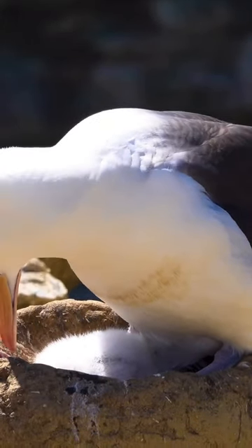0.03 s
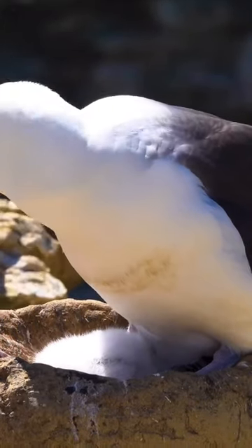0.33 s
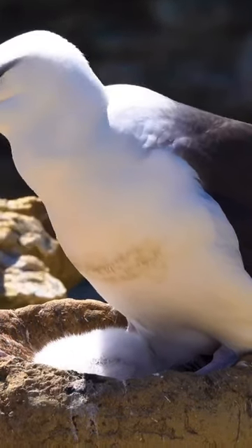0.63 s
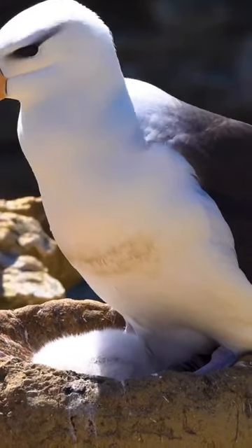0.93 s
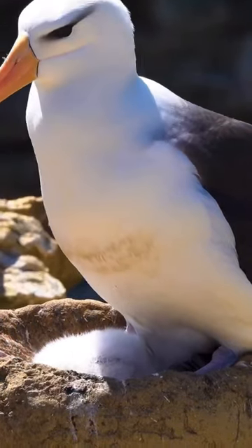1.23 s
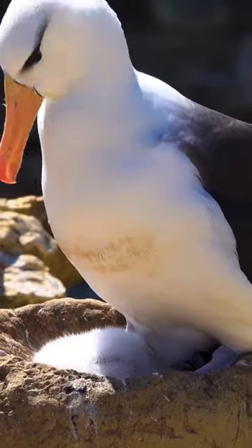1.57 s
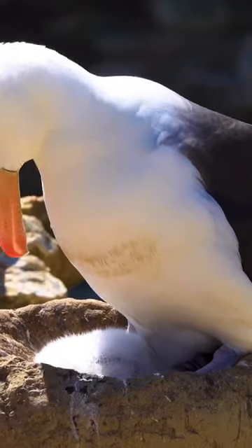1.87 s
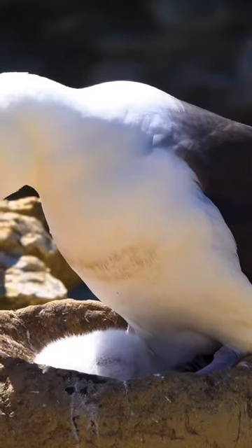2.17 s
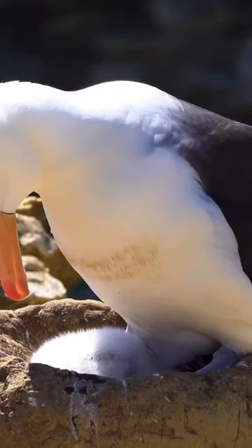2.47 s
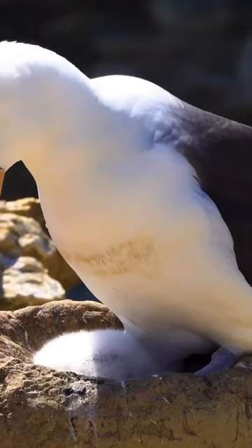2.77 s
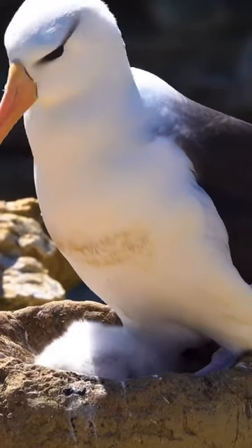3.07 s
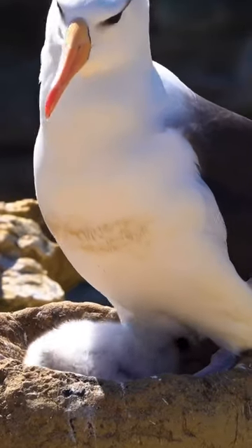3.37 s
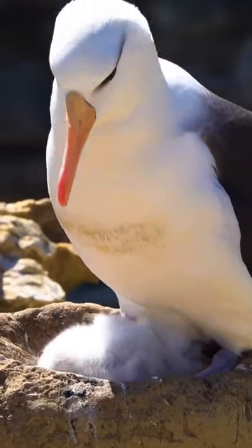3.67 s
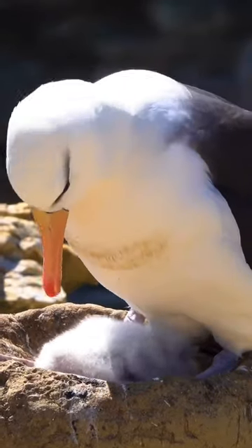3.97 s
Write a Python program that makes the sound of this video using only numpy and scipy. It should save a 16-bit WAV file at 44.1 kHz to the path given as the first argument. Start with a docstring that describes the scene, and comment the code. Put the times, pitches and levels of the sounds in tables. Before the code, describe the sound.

Harsh, raspy seabird squawks repeat close by, about every 0.4 seconds, some breaking into falling squeals. Thin arched whistles come around 0.5, 1.7 and 2.8 seconds. From about 3.1 seconds the calls become a louder cackle with short yips and faint grunts. Dry snaps sound near the start and at 3.9 seconds. A distant colony's wash and a soft hiss of wind or surf continue throughout.

```python
"""Seabird colony, close by.

Harsh squawks come about every 0.4 s: irregular flaps of the syrinx ring the throat's resonances.
Some break into a falling squeal. Thin arched whistles, short yips, dry snaps and faint grunts join in,
all with short reflections from a cliff. Behind: the far colony's restless wash, a hiss of wind or surf."""
import sys
import numpy as np
from scipy import signal
from scipy.fft import rfft, irfft
from scipy.io import wavfile
from scipy.ndimage import uniform_filter1d, map_coordinates

SR = 44100
rng = np.random.default_rng(int(sys.argv[2]) if len(sys.argv) > 2 else 0)


def int16_out(signal):
    """Quantize to a 16-bit WAV file."""
    q = np.round(np.clip(np.atleast_2d(signal).T, -1, 1) * 32767)
    wavfile.write(sys.argv[1], SR, q.astype(np.int16))


N = 176400

# Far colony EQ: freq_hz, gain_db
WASH_EQ = [(700, -49), (950, -42.5), (1050, -18), (1300, -28), (1600, 1.5), (2100, 5), (2700, -0.5),
           (3500, -5.5), (5000, -14.5), (7000, -26), (15000, -60)]
# Hiss EQ: freq_hz, gain_db
HISS_EQ = [(800, -29), (5000, 1.5), (11000, 3.5), (15500, 2.5)]
# Hiss envelope: time_s, level_db
HISS_ENVELOPE = [(0, -44.5), (.8, -54.5), (1.25, -51.5), (1.62, -42), (2.05, -46.5), (2.35, -53),
                 (2.749, -42), (3.25, -41), (3.72, -53)]
# Dry snaps: start_s, centre_hz, gain_db
SNAPS = [(.059, 2200, -25), (.501, 2450, -20), (3.872, 2120, -20), (3.893, 3100, -15.5), (3.922, 2380, -17)]
# Rasps of the squawks, one gain per throat band: start_s, length_s, low_db, mid_db, upper_db, hiss_db
RASPS = [(0.129, 0.1, -40.5, -23, -34.5, -37.5), (0.242, 0.052, -53, -37, -51, -63),
         (0.488, 0.045, -82, -23.5, -33.5, -37), (0.533, 0.094, -48.5, -26, -34, -31),
         (0.822, 0.052, -50, -25.5, -36.5, -46), (0.916, 0.037, -51, -35, -36, -38),
         (0.959, 0.084, -38, -30.5, -28.5, -34.5), (1.104, 0.027, -44.5, -29.5, -44, -44.5),
         (1.194, 0.037, -89, -34, -41.5, -45), (1.303, 0.024, -42, -37, -35, -41),
         (1.351, 0.084, -36, -33.5, -30.5, -37), (1.437, 0.049, -43.5, -30.5, -39.5, -40.5),
         (1.67, 0.094, -53, -30.5, -51, -41.5), (1.72, 0.12, -35.5, -25.5, -35.5, -31),
         (1.957, 0.048, -49, -26, -36.5, -46), (2.051, 0.033, -44.5, -33, -35, -36),
         (2.091, 0.084, -38, -30, -28.5, -34.5), (2.235, 0.051, -52.5, -32, -46, -46.5),
         (2.331, 0.026, -84, -30.5, -38, -44), (2.437, 0.036, -42, -34.5, -33.5, -43.5),
         (2.485, 0.082, -36, -31.5, -30, -37.5), (2.574, 0.044, -42, -29.5, -39.5, -44.5),
         (2.802, 0.056, -52, -29.5, -42, -38.5), (2.858, 0.12, -37.5, -24, -34, -31.5),
         (3, 0.091, -46, -31, -31, -49), (3.177, 0.046, -34.5, -24.5, -33.5, -53),
         (3.264, 0.079, -35, -24.5, -25.5, -34), (3.333, 0.081, -33, -20.5, -29.5, -35),
         (3.529, 0.063, -43.5, -20, -25, -31), (3.6, 0.046, -41.5, -22.5, -35, -44),
         (3.656, 0.063, -28.5, -25.5, -32, -44.5), (3.871, 0.079, -40.5, -24, -25.5, -37),
         (3.932, 0.077, -40, -22, -28, -40)]
# Throat resonances, one list per band (low, mid, upper, hiss): centre_hz, width_hz, gain_db
THROAT_BANDS = [
    [(1056, 174, -6), (1231, 290, -2)],
    [(1596, 184, 2), (2160, 667, -2.5), (2350, 130, 1.5), (2605, 260, -1)],
    [(2950, 200, -9), (3280, 960, -2.5), (4180, 660, -5.5), (4670, 320, -4), (5424, 710, -8)],
    [(6020, 1570, 2), (7610, 670, 2), (8340, 490, 0), (10100, 7400, -10)],
]
# Squeals and yips: start_s, length_s, first_hz, last_hz, level_db
SQUEALS = [(.153, 0.047, 1620, 1524, -21), (.208, 0.032, 1665, 1484, -24), (.514, 0.026, 1520, 1530, -27.5),
           (.568, 0.038, 1534, 1557, -26), (1.362, .018, 1093, 1120, -30.5),
           (1.378, 0.036, 1630, 1603, -24), (1.468, 0.031, 2630, 2675, -29),
           (1.512, .012, 2430, 2030, -25.5), (1.739, 0.017, 1280, 1220, -27.5),
           (1.74, 0.019, 1614, 1620, -21.5), (1.758, 0.051, 1802, 1531, -22),
           (1.762, 0.038, 3570, 3250, -31.5), (1.783, .02, 1249, 1098, -26.5),
           (1.817, 0.026, 3140, 3010, -26.5), (1.828, 0.022, 2194, 2094, -24.5),
           (3.303, 0.026, 2275, 2354, -18), (3.402, .0087, 1775, 1850, -16.5),
           (3.406, 0.0063, 2560, 2430, -16.5), (3.489, 0.0053, 2070, 1790, -15.5),
           (3.519, 0.0039, 2310, 2240, -15.5), (3.535, 0.014, 2723, 2674, -18.5),
           (3.581, 0.0093, 2620, 2540, -16.5), (3.665, 0.018, 1516, 1430, -24.5),
           (3.912, .011, 1960, 1950, -21.5), (3.987, .016, 2248, 2407, -19)]
# Arched whistles: start_s, length_s, top_hz, droop_hz, level_db
WHISTLES = [(.298, .16, 4080, 850, -38.5), (.53, .05, 4100, 120, -36), (.622, .062, 4120, 200, -42),
            (.672, .09, 4090, 480, -42), (1.62, .18, 4040, 520, -35), (1.876, .072, 4600, 760, -40)]
# Grunts: start_s, length_s, pitch_hz, level_db
GRUNTS = [(1.949, .043, 567, -62), (3.085, .043, 570, -59), (3.318, .045, 687, -49),
          (3.315, .065, 330, -61), (3.664, .04, 323, -54), (3.685, .035, 850, -40), (3.71, .07, 730, -50),
          (3.854, .065, 713, -51)]
# Phase lead of the left microphone: freq_hz, lead_rad
LEFT_LEAD = [(100, 0.39), (700, 0.29), (2700, 0.44), (5000, 0.82), (6800, .05), (15000, 0.024)]


def undb(db):
    return 10 ** (np.asarray(db) / 20)


def unit_rms(x):
    return x / np.sqrt(np.mean(x ** 2))


def hold_rms(x, window_s=.04):
    """Even out the loudness, keep the fast grain."""
    return x / np.sqrt(uniform_filter1d(x ** 2, int(window_s * SR)) + 1e-18)


def wander(rate_hz):
    """Smooth random curve, spread near 1."""
    hold = max(int(SR / rate_hz), 2)
    steps = np.repeat(rng.standard_normal(N // 40)[:N // hold + 1], hold)
    return 1.9 * uniform_filter1d(uniform_filter1d(steps, hold), hold)[:N]


def resonate(x, centre_hz, width_hz):
    """The same band-pass twice; width_hz is per pass."""
    b, a = signal.iirpeak(min(centre_hz, .45 * SR), centre_hz / width_hz, fs=SR)
    return signal.lfilter(b, a, signal.lfilter(b, a, x))


def per_bin(points):
    """Interpolate (freq_hz, value) onto FFT bins, in log frequency."""
    hz, value = np.array(points).T
    return np.interp(np.log(np.arange(N // 2 + 1) * SR / N + 1), np.log(hz), value)


def add(out, start_s, sound):
    i = max(int(start_s * SR), 0)
    out[i:i + len(sound)] += sound[:max(N - i, 0)]


def segment(x, start_s, length_s):
    return np.roll(x, -int(start_s * SR))[:int(length_s * SR)]


def tone(pitch_hz, taper, harmonics_db=(0,)):
    """Harmonics on a pitch curve, faded in and out."""
    phase = 2 * np.pi * np.cumsum(pitch_hz) / SR
    wave = sum(undb(db) * np.sin(k * phase) for k, db in enumerate(harmonics_db, 1))
    return np.sqrt(2) * signal.windows.tukey(len(pitch_hz), taper) * wave


def with_repeat(rows, from_s=1, to_s=2, delay_s=1.133):
    """All rows, plus a delayed copy of one phrase."""
    phrase = [(start_s + delay_s, *rest) for start_s, *rest in rows if from_s < start_s < to_s]
    return list(rows) + phrase


def pan(right_db):
    return undb(np.array([[-.5], [.5]]) * right_db)


def mic_pair(x):
    """Mono to two microphones; the left leads in phase."""
    turn = np.exp(.5j * per_bin(LEFT_LEAD))
    return irfft(rfft(x) * np.array([turn, 1 / turn]), N)


def colony_wash(level_db=-34, swell_db=1.1, flicker_db=2.8, common_share=.59):
    """Far colony, mostly right: noise bands flicker alone and swell together."""
    bands = 0
    for hz in np.geomspace(900, 14000, 14):
        bands += resonate(rng.standard_normal((3, N)), hz, hz / 3) * undb(flicker_db * wander(45))
    shaped = irfft(rfft(bands) * undb(per_bin(WASH_EQ)), N)
    common, per_ear = mic_pair(shaped[0]), shaped[1:]
    wash = unit_rms(np.sqrt(common_share) * common + np.sqrt(1 - common_share) * per_ear)
    return wash * undb(level_db + swell_db * wander(26.59)) * pan(right_db=6)


def hiss(width=.23):
    """Wind or surf: smooth high noise, swelling slowly."""
    mid, side = irfft(rfft(rng.standard_normal((2, N))) * undb(per_bin(HISS_EQ)), N)
    air = unit_rms(mid + width * side * np.array([[1], [-1]]))
    level_db = np.interp(np.arange(N) / SR, *np.array(HISS_ENVELOPE).T)
    return air * undb(level_db) * pan(right_db=2)


def snaps(decay_s=.0025, width_hz=890):
    """Dry cracks: noise bursts through one resonance."""
    out, t = np.zeros(N), np.arange(SR // 50) / SR
    for start_s, centre_hz, gain_db in SNAPS:
        burst = rng.standard_normal(len(t)) * np.exp(-t / decay_s)
        crack = resonate(burst, centre_hz, width_hz)
        add(out, start_s, 2 * undb(gain_db) * crack / np.abs(crack).max())
    return out


def syrinx_rattle(rate_hz=261.4, jitter=.35, scatter_db=.5, puff_s=.0022, click_db=-18.5, flutter_db=.9):
    """Irregular flaps, each a click and a puff of air."""
    gap, strength = rng.standard_normal((N // 60, 2)).T
    at = (np.cumsum(np.exp(jitter * gap)) * SR / rate_hz).astype(int)
    clicks = np.zeros(N)
    clicks[at[at < N]] = undb(scatter_db * strength[at < N])
    puffs = signal.lfilter([1], [1, -np.exp(-1 / (puff_s * SR))], clicks) * rng.standard_normal(N)
    return (unit_rms(puffs) + undb(click_db) * unit_rms(clicks)) * undb(flutter_db * wander(70.4))


def squawk_source(rush_db=-2.5, cackle_from_s=3.1, beat_hz=90, beat_jitter=.35, beat_fade_db=13):
    """The rattle, first evened out by a rush of air, then broken into a cackle of fading beats."""
    rattle = syrinx_rattle()
    beat_phase = np.cumsum(beat_hz * np.exp(beat_jitter * wander(70.4))) / SR % 1
    cackle = unit_rms(rattle * undb(-beat_fade_db * beat_phase))
    breathy = rattle + undb(rush_db) * rng.standard_normal(N)
    return np.where(np.arange(N) / SR < cackle_from_s, breathy, cackle)


def squawks(attack_s=.01, release_s=.024, sag=.05, flicker_db=2.6, mid_squeak_share=.35):
    """The syrinx rings the throat; the resonances sink through each rasp."""
    t, source = np.arange(N) / SR, squawk_source()
    band_power, bend = np.zeros((len(THROAT_BANDS), N)), np.zeros(N)
    for start_s, length_s, *gains_db in RASPS:
        ramps = np.minimum((t - start_s) / attack_s, (start_s + length_s - t) / release_s)
        gate = np.clip(ramps + .5, 0, 1)
        on = gate > 0
        band_power[:, on] += np.outer(undb(gains_db), gate[on]) ** 2
        bend[on] += sag * (t[on].mean() - t[on]) / length_s
    out = 0
    for power, band, squeak_share in zip(band_power, THROAT_BANDS, (0, mid_squeak_share, 0, 0)):
        ring = 0
        for k, (centre_hz, width_hz, gain_db) in enumerate(band):
            gain = (-1) ** k * undb(gain_db + flicker_db * wander(70.4))
            ring += gain * resonate(source, centre_hz, width_hz)
        if squeak_share:
            ring = np.sqrt(1 - squeak_share) * unit_rms(ring) + np.sqrt(squeak_share) * squeaks()
        sinking = map_coordinates(ring, [np.cumsum(1 + bend)], mode="mirror")
        out += np.sqrt(power) * hold_rms(sinking)
    return out


def squeaks(count=900, median_hz=2155.6, spread=.1688, median_s=.00893, scatter_db=4):
    """Tiny random gliding tones within the rasps."""
    out, starts_s = np.zeros(N), rng.random(count) * N / SR
    for start_s, (pitch, glide, length, strength) in zip(starts_s, rng.standard_normal((count, 4))):
        samples = int(SR * median_s * np.exp(length / 2)) + 2
        pitch_hz = median_hz * np.exp(spread * (pitch + glide * np.linspace(0, .5, samples)))
        add(out, start_s, undb(scatter_db * strength) * tone(pitch_hz, taper=.61))
    return unit_rms(out)


def squeals(wobble=.009, rough_db=1.4):
    """The voice catches on a short, unsteady glide."""
    out, detune = np.zeros(N), 1 + wobble * wander(400)
    for start_s, length_s, first_hz, last_hz, level_db in with_repeat(SQUEALS):
        pitch_hz = np.linspace(first_hz, last_hz, int(length_s * SR)) * segment(detune, start_s, length_s)
        add(out, start_s, undb(level_db) * tone(pitch_hz, taper=.7, harmonics_db=(0, -20, -27)))
    return out * undb(rough_db * wander(460))


def whistles(arch_power=2.3, wobble=.004, jitter=.009, rough_db=2.2):
    """Thin, slightly hoarse peeps that rise, hold and fall."""
    out, detune = np.zeros(N), 1 + wobble * wander(90) + jitter * wander(1100)
    for start_s, length_s, top_hz, droop_hz, level_db in with_repeat(WHISTLES):
        arch_hz = top_hz - droop_hz * np.abs(np.linspace(-1, 1, int(length_s * SR))) ** arch_power
        pitch_hz = arch_hz * segment(detune, start_s, length_s)
        add(out, start_s, undb(level_db) * tone(pitch_hz, taper=.3, harmonics_db=(0, -20, -21)))
    return out * undb(rough_db * wander(140))


def grunts(wobble=.018, rough_db=2.5):
    """Faint, rough low tones under the calls."""
    out, detune = np.zeros(N), 1 + wobble * wander(200)
    for start_s, length_s, pitch_hz, level_db in GRUNTS:
        add(out, start_s, undb(level_db) * tone(pitch_hz * segment(detune, start_s, length_s), taper=1))
    return out * undb(rough_db * wander(200))


def cliff_echo(x, t60_s=.09, cutoff_hz=6500, gain_db=2):
    """Short, dull reflections, different at each ear."""
    t = np.arange(SR // 2) / SR
    tail = rng.standard_normal((2, len(t))) * np.exp(-np.log(1000) * t / t60_s)
    tail /= np.sqrt(np.sum(tail ** 2, axis=1, keepdims=True))
    tail = signal.sosfilt(signal.butter(2, cutoff_hz, fs=SR, output="sos"), tail)
    return undb(gain_db) * signal.fftconvolve(x[None], tail, axes=1)[:, :N]


def scene(squawk_db=-3.5, low_cut_hz=902, tonal_send_db=-6):
    """Near birds, their reflections and the background."""
    low_cut = signal.butter(10, low_cut_hz, "highpass", fs=SR, output="sos")
    harsh = signal.sosfilt(low_cut, undb(squawk_db) * squawks() + snaps())
    tonal = squeals() + whistles() + grunts()
    echo = cliff_echo(harsh + undb(tonal_send_db) * tonal)
    return mic_pair(harsh + tonal) + echo + colony_wash() + hiss()


def record(dry):
    """The recorder's steep low-pass."""
    cutoff_hz = 15600
    return signal.sosfilt(signal.ellip(10, .2, 80, cutoff_hz, fs=SR, output="sos"), dry)


dry = scene()
out = record(dry)
int16_out(out)
```